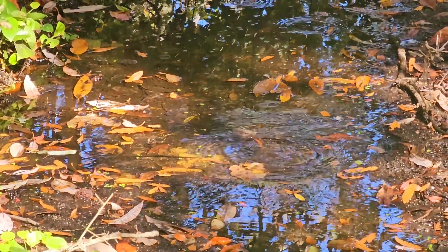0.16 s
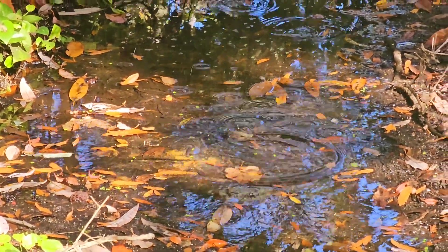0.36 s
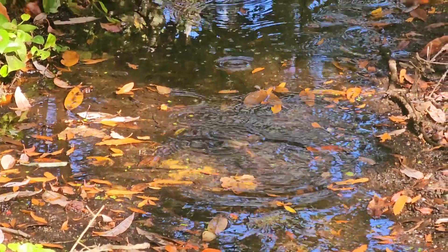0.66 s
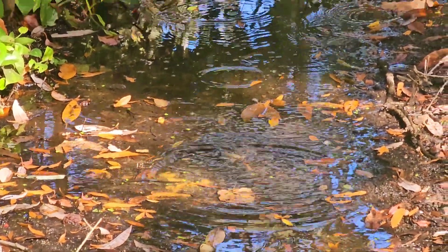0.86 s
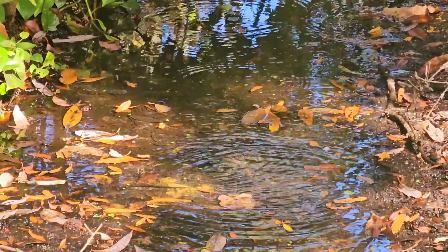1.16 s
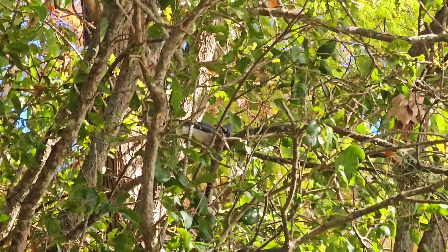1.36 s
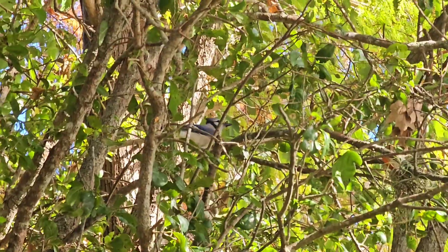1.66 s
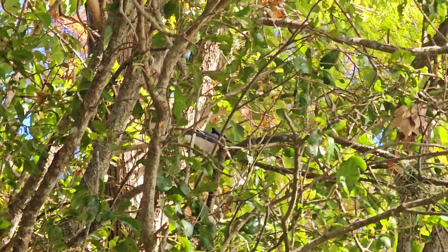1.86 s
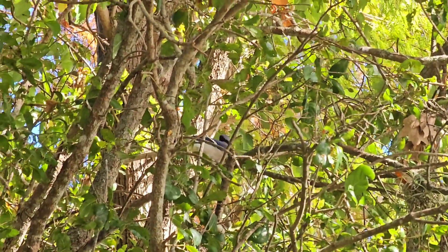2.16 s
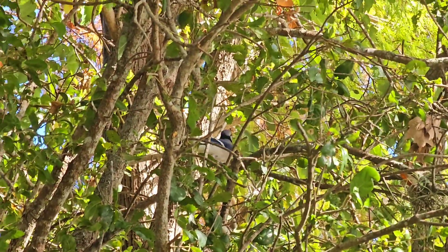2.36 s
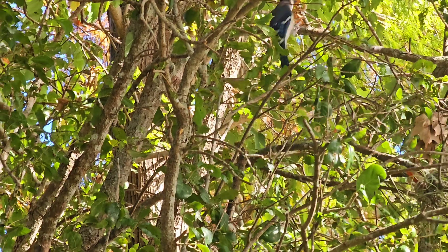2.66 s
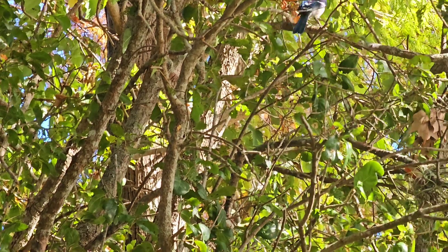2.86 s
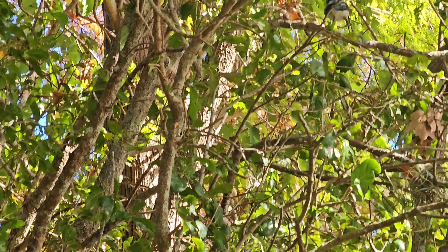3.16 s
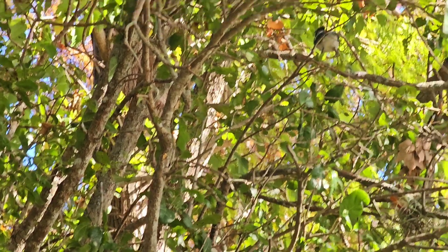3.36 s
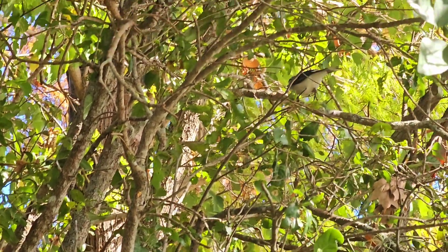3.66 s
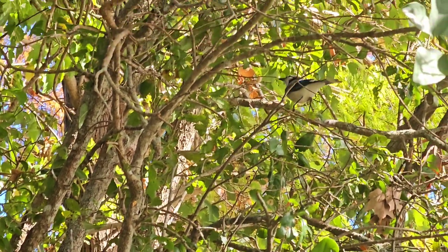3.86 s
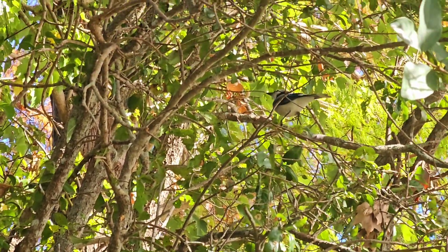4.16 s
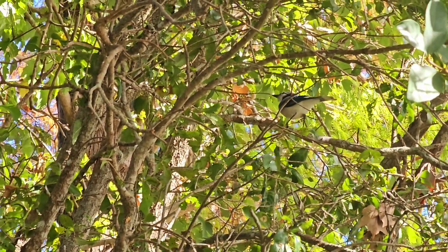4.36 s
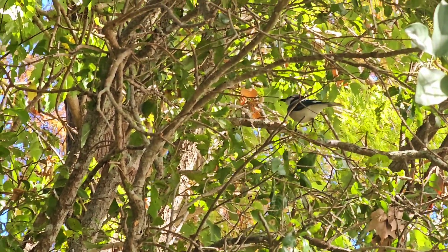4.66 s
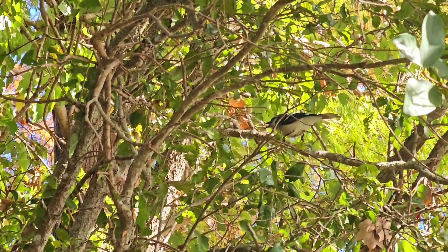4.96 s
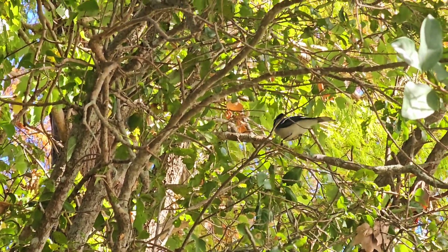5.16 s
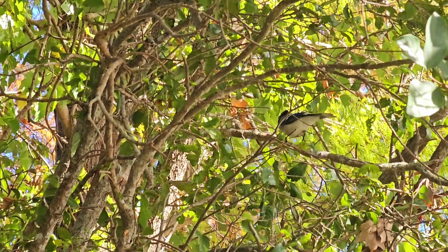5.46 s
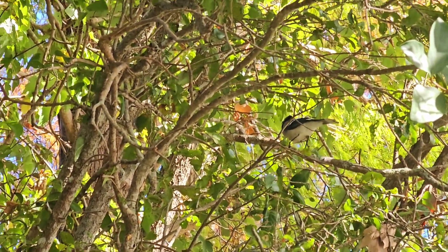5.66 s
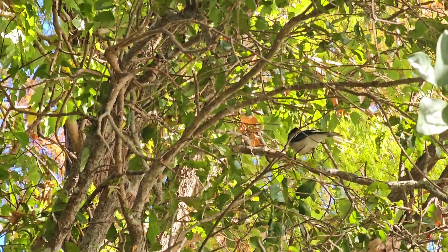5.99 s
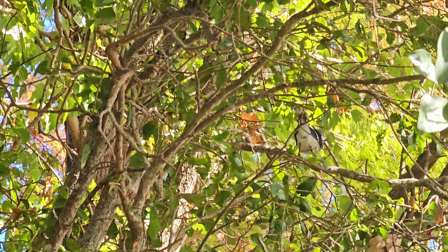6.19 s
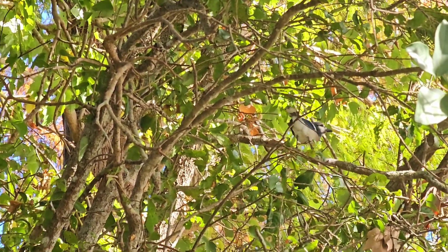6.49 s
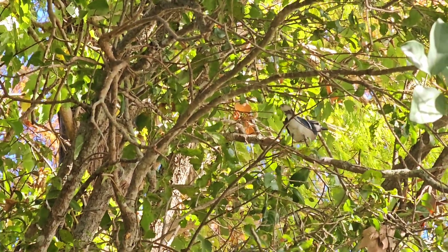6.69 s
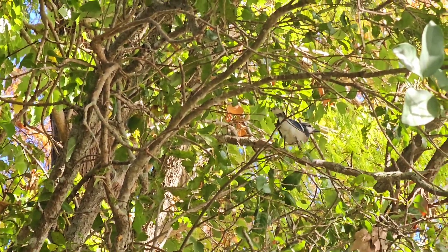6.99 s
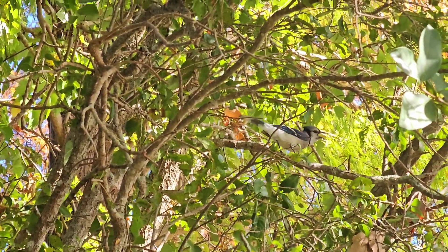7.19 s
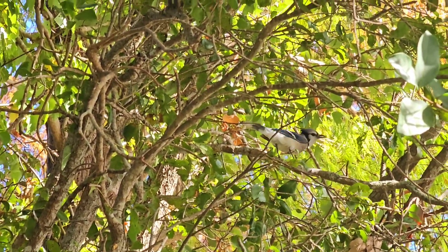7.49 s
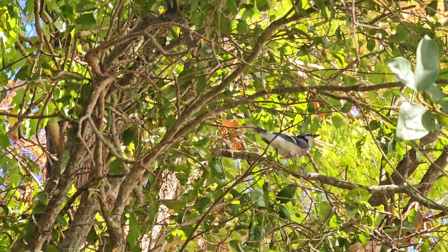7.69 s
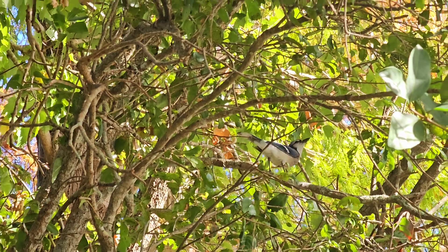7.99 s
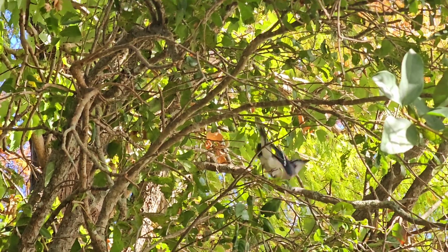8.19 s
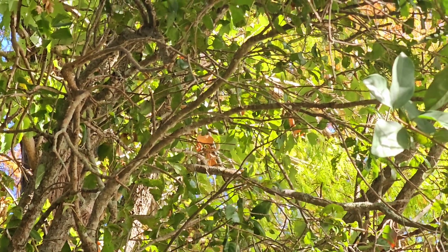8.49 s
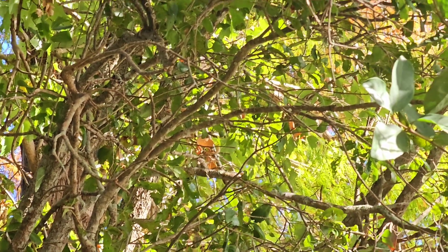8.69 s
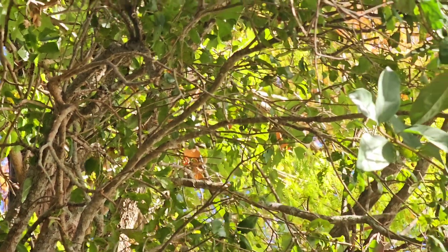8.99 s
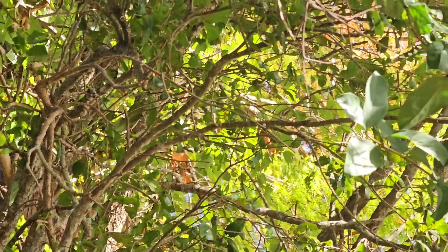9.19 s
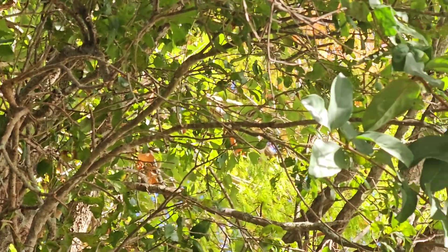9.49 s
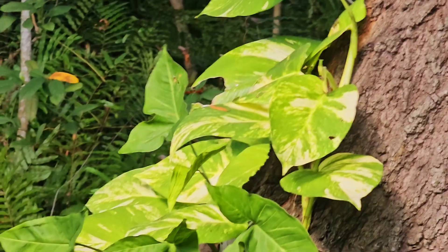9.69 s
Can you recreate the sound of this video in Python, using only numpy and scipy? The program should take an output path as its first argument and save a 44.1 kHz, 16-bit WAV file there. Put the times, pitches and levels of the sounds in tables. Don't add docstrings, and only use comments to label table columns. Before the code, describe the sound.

A quiet outdoor bed runs throughout: low, distant traffic rumble and drone, swelling gently, under a thin hiss that moves with the breeze. From 0 to 0.5 seconds small dry ticks of leaves or drips patter, with a few more scattered later. Near 1.3 seconds the ambience switches with a soft low thump. A jay then calls at about 1.8, 3.4, 4.7, 6.1, 7.1 and 9.3 seconds. Each cry lasts around a third of a second, starting as a bright nasal tone, sliding down and breaking into a rasp, with echoes among the trees. A faint, fuzzy jay answers from afar near 4.0, and a tiny bird chips at 4.4. At 9.65 the scene cuts, stopping the final echo; a brief low rumble with duller hiss and one very faint chip remain until about 9.8. Stereo phone microphones hear the airy hiss wide and the bass centred.

```python
import sys
import numpy as np
from scipy import signal
from scipy.fft import rfft, irfft
from scipy.io import wavfile
from scipy.ndimage import uniform_filter1d, minimum_filter1d

SR = 44100
rng = np.random.default_rng(int(sys.argv[2]) if len(sys.argv) > 2 else 0)


def file_out(sig):
    cols = np.atleast_2d(sig).T
    lim = np.clip(cols, -1, 1)
    pcm = np.round(lim * 32767).astype(np.int16)
    wavfile.write(sys.argv[1], SR, pcm)


def rack_gain(trim_db):
    fader = np.asarray(trim_db, float)
    return 10 ** (fader / 20)


N = 433944
FIRST_CHANGE_S, LAST_CHANGE_S = 1.2665, 9.648
TOP_HZ = 15850

# frequency in Hz, level in dB per Hz.
RUMBLE = [(12, -46), (20, -10), (37, -2), (54, 3.5), (76, -6), (107, -2), (140, -10.5), (184, -3.5),
          (264, -5.5), (323, -15), (353, -16.5), (400, -21), (520, -42), (880, -120)]
# frequency in Hz, level in dB per Hz.
HISS = [(240, -35), (400, -9.5), (467, 0.5), (512, -2.5), (812, -2.5), (890, -3.5), (1210, -8.5),
        (1410, -8), (2010, -14.5), (2650, -21), (5470, -25), (7790, -38), (10400, -42), (11800, -34),
        (15800, -41.5)]
# frequency in Hz, left-right likeness from 0 to 1.
AIR_LIKENESS = [(60, 0.95), (200, 0.97), (380, 0.91), (700, 0.35), (1500, 0.083), (4000, 0.15),
                (12000, .15)]
# frequency in Hz, left over right in dB.
AIR_PAN = [(60, 0), (130, 1.0), (290, 0.5), (640, 1), (1410, 2), (3100, -3), (6820, -2), (15000, 8)]
# frequency in Hz, lead of the left in radians.
AIR_LEAD = [(40, .02), (250, 0.11), (1000, 0.72), (3000, 0.72), (8000, 4.8)]
# start in seconds, traffic, drone, hiss and top hiss in dB.
STRETCHES = [
    (0, -2.5, 3.5, 2, 3.5),
    (1.2665, 1.23, 0.3, 2, 0.3),
    (9.648, 4.5, -7.5, 0.1, -11),
]
# time in seconds, level in dB.
TRAFFIC_EBB = [(0, 2.6), (1.3, 0.5), (4.3, -0.5), (5.2, -1.5), (7, -1.1), (8.7, -1), (9.84, -.5)]
# closest in seconds, lasts in seconds, rumble in dB, drone in dB.
PASSES = [(0.704, 0.87, 5.5, 1), (1.483, 0.32, -3, 8), (2.058, 0.3, -3, 7), (4.92, 0.32, 3.5, 3.5),
          (5.746, 0.39, 3.5, 7), (6.895, 0.59, 5.5, -1), (7.606, 0.86, 0, 2), (8.347, 0.073, 3, -1)]
# time in seconds, hiss level in dB.
BREEZE = [(0, 7), (.8, -0.5), (1.25, -1.5), (2.7, 1.5), (5.7, -3), (8, -3), (9.2, -2.5), (9.84, 3)]
# start in seconds, peak in dB, left over right in dB.
TICKS = [(0.096, -42, -4), (0.1494, -41, -2.5), (0.271, -41, -2), (0.379, -40, -0.5), (0.445, -43, -3),
         (0.509, -42, -2), (0.9194, -54, 3), (1.1994, -53, 15.5), (1.625, -47, 5), (3.3154, -47, 3),
         (4.2974, -58, -6), (4.373, -50, -2.5), (5.234, -44, 0), (8.244, -49, -8), (8.5494, -57, 3),
         (8.7694, -58, -2.5)]
# start in seconds, peak in dB, pitch in Hz, width as a share of the pitch.
CHIPS = [
    (4.362, -46, 5300, .12),
    (9.685, -59, 6000, .05),
]
# start in seconds, length in seconds, level in dB, fade in dB per second,
# first pitch in Hz, last pitch in Hz.
FAR_JAY = (3.97, .23, -44, -120, 1025, 870)
# frequency in Hz, 60 dB decay in seconds.
WOOD_TAIL = [(1500, 0.56), (3000, 0.56), (4000, 0.58), (6000, 0.45), (9000, 0.47), (14000, 0.1)]
# start in seconds, length in seconds, effort in dB, top pitch in Hz,
# pitch before the last drop in Hz.
CALLS = [(1.754, 0.31, -23, 999, 879.5), (3.427, 0.3, -26, 1002, 873.5), (4.718, 0.31, -23.5, 991.5, 874),
         (6.117, 0.32, -23, 985, 890), (7.102, .285, -22, 1008, 870), (9.322, 0.28, -22.5, 1002, 859)]
# rasp starts after seconds, swells for seconds, rasp over the effort in dB,
# brightness in dB.
VOICES = [(0.19, 0.1, -4.5, -14.5), (0.16, 0.066, -5, -12), (0.17, 0.074, -8, -14),
          (0.21, 0.045, -7.5, -14.5), (0.173, 0.034, -9, -12.5), (0.13, 0.086, -10.5, -17.5)]
# frequency in Hz, level in dB.
BEAK = [(1100, -38.5), (1550, -22.5), (1900, -21), (2900, -12.5), (3700, -0.5), (4100, -3), (4800, -12.5),
        (5600, -20), (6100, -20.5), (7000, -24.5), (9400, -27), (10400, -35.5), (11100, -40), (11900, -29),
        (13000, -30), (15500, -40)]
# frequency in Hz, width in Hz, level in dB.
THROAT = [(2880, 2340, 1.5), (3530, 990, 6.5), (4340, 1000, 10), (5440, 760, 2.5), (6800, 1800, -6),
          (12000, 980, -15.5)]
# overtone number, level in dB.
HELD_OVERTONES = [(3, -33), (4, -2.5), (5, 2.5), (6, -13)]
# frequency in Hz, left over right in dB.
BIRD_PAN = [(1800, 4.5), (2900, -2.5), (3900, -0.5), (5500, -9), (7000, 7), (9500, 7.5), (12000, 1),
            (15000, 8)]
# frequency in Hz, lead of the left in radians.
BIRD_LEAD = [(1800, 0.25), (2900, 0.7), (3900, 2.2), (5500, 4.04), (9000, 4)]


def evened(x):
    return x / np.sqrt(np.mean(x ** 2) + 1e-20)


def read(points, hz):
    f, value = np.transpose(points)
    return np.interp(np.log(hz + 1), np.log(f + 1), value)


def add(mix, s, sound):
    part = mix[:, round(s * SR):][:, :sound.shape[1]]
    part += sound[:, :part.shape[1]]


def resonate(x, hz, width):
    b, a = signal.iirpeak(hz, hz / width, SR)
    return signal.lfilter(b, a, signal.lfilter(b, a, x))


def wander(n, hz):
    return evened(signal.lfilter(*signal.butter(2, hz, fs=SR), rng.standard_normal(n)))


def ports(x, pan, lead):
    hz = np.fft.rfftfreq(x.shape[1], 1 / SR)
    half = rack_gain(read(pan, hz) / 2) * np.exp(.5j * read(lead, hz))
    return irfft(rfft(x) * np.array([half, 1 / half]), x.shape[1])


def air_levels(t, hz):
    starts, *levels = np.transpose(STRETCHES)
    stretch = np.searchsorted(starts[1:], t)
    traffic_db, drone_db, hiss_db, top_db = (v[stretch] for v in levels)
    traffic_db = traffic_db + np.interp(t, *np.transpose(TRAFFIC_EBB))
    breeze_db = np.interp(t, *np.transpose(BREEZE))
    closest, lasts, *swells = np.transpose(PASSES)
    rumble_db, passing_db = swells @ np.exp(-((t - closest[:, None]) / lasts[:, None]) ** 2)
    under = [1 / (1 + (hz / edge_hz) ** 6) for edge_hz in (125, 320, 1800, 6500)]
    field_db = np.outer(under[2], traffic_db)
    field_db += np.outer(under[0], rumble_db)
    field_db += np.outer(under[1] - under[0], drone_db + passing_db)
    field_db += np.outer(under[3] - under[2], hiss_db + 0.41 * breeze_db)
    return field_db + np.outer(1 - under[3], top_db + breeze_db)


def outdoors():
    size, hop = 4096, 1024
    frames, hz = N // hop + 5, np.fft.rfftfreq(size, 1 / SR)
    t = np.arange(-1, frames - 1) * hop / SR
    a, b, c, d, patches = rng.standard_normal((5, len(hz), frames))
    patches = evened(uniform_filter1d(uniform_filter1d(patches, 6, 0), 5, 1))
    left, other = a + 1j * b, c + 1j * d
    same = np.clip(read(AIR_LIKENESS, hz), -1, 1)[:, None]
    z = np.array([left, same * left + np.sqrt(1 - same ** 2) * other])
    colour = rack_gain(read(RUMBLE, hz)) + rack_gain(read(HISS, hz) - 15)
    z *= colour[:, None] * rack_gain(air_levels(t, hz) + 2.69 * patches)
    air = signal.istft(z, nperseg=size, noverlap=size - hop)[1]
    return rack_gain(-35) * evened(ports(air, AIR_PAN, AIR_LEAD)[:, hop:hop + N])


def scene_change():
    t = np.arange(900) / SR
    jump = -np.exp(-t / 0.01) * np.cos(2 * np.pi * 190 * t - .6)
    return rack_gain(-22.5) * np.array([jump, jump])


def tick(peak_db, hz, pan_db, share, length):
    t, noise = np.arange(2500) / SR, rng.standard_normal((2, 2500))
    body = evened(resonate(noise, hz, np.clip(share, .04, 1.5) * hz))
    fizz = 0.46 * share ** 2 * evened(resonate(noise, 14500, 5000))
    swell = t / length * np.exp(1 - 2 * t / length)
    lean = rack_gain(np.array([[.5], [-.5]]) * pan_db)
    return rack_gain(peak_db - 5) * (body + fizz) * swell * lean


def trees(x, direct_db):
    near_db, near_t60_s, far_db = 0.5, 0.23, -13.5
    size = round(.75 * SR)
    t = np.arange(size) / SR
    sparse = rng.standard_normal((3, size)) * (rng.random((3, size)) < 1500 / SR)
    near = (sparse[:2] + 0.13 * sparse[2]) * rack_gain(-60 * t / near_t60_s) * (t > .004)
    hz, s, z = signal.stft(rng.standard_normal((2, size)), SR, nperseg=256)
    z = z * rack_gain(-60 * s / read(WOOD_TAIL, hz)[:, None])
    far = signal.istft(z, SR, nperseg=256)[1][:, :size] * np.minimum(t / 0.075, 1)
    echo = rack_gain(near_db) * near / np.linalg.norm(near[0]) + rack_gain(far_db) * far / np.linalg.norm(far[0])
    echo[:, 0] += rack_gain(direct_db)
    return signal.fftconvolve(x[None], echo, axes=1)


def far_jay(length, level_db, fade_db, top_hz, end_hz):
    t = np.arange(0, length, 1 / SR)
    turns = np.cumsum(end_hz + (top_hz - end_hz) * (1 - t / length) ** 1.7) / SR
    tone = 0
    for k, db in [(3, -1), (4, -3), (5, -14)]:
        tone = tone + rack_gain(db) * wander(len(t), 220) * np.cos(2 * np.pi * k * turns)
    return rack_gain(level_db + fade_db * t) * tone * signal.windows.tukey(len(t), .15)


def jay_pitch(t, length, top_hz, late_hz):
    hold_s, knee_s, drop_s = .035, .15, .07
    times = [0, hold_s, knee_s, length - drop_s, length]
    hz = np.interp(t, times, [top_hz, top_hz, 916.3, late_hz, 800])
    return uniform_filter1d(hz, size=900, mode="nearest")


def clear_tone(t, hz, turns, rough, bright_db):
    k = np.arange(1, 18)[:, None]
    upper_db = np.clip((k * hz - 4300) / 600, 0, 1) * (bright_db + 13.5)
    gains = rack_gain(read(BEAK, k * hz) + upper_db) * (k * hz < TOP_HZ)
    flutter = rng.standard_normal(gains.shape)
    flutter = evened(uniform_filter1d(uniform_filter1d(flutter, 150), 150))
    gains *= 1 + np.clip((k - 3.5) * .3, .12, .7) * flutter
    gains[4] *= rack_gain(-12.5)
    gains[:3] *= (1 - np.exp(-(t / .009) ** 2)) * (1 - .15 * rough)
    return (gains * np.cos(2 * np.pi * k * turns + 0.373 * k ** 2)).sum(0) / 0.71


def second_membrane(t):
    turns = np.cumsum(879 * (1 + .008 * wander(len(t), 300))) / SR
    return sum(rack_gain(db) * np.cos(2 * np.pi * n * turns) for n, db in HELD_OVERTONES)


def jay(length, effort_db, top_hz, late_hz, rasp_s, swell_s, rasp_db, bright_db):
    t = np.arange(0, length, 1 / SR)
    attack_s, attack_db, release_s, release_db = 0.026, -21, 0.051, -11
    shape_db = np.interp(t, [0, attack_s, length - release_s, length], [attack_db, 0, 0, release_db])
    effort_db = effort_db + shape_db + 1.5 * wander(len(t), 21)
    bright_db = bright_db + 9 * shape_db / attack_db
    hz = jay_pitch(t, length, top_hz, late_hz)
    rough = np.clip((t - rasp_s) / swell_s / 1.22 + 0.23, 0, 1) ** 2
    scoop = 1 - .27 * np.exp(-(t / .007) ** 2.6)
    shake = (.004 + .013 * rough) * wander(len(t), 400)
    turns = np.cumsum(hz * scoop * (1 + shake)) / SR
    tone = clear_tone(t, hz, turns, rough, bright_db)

    puffs = rng.standard_normal(len(t)) * (.3 + np.exp(-(turns % 1) / .35)) * rack_gain(1.5 * wander(len(t), 200))
    modes = [(-1) ** i * rack_gain(db) * evened(resonate(puffs, f, w)) for i, (f, w, db) in enumerate(THROAT)]
    onset = np.exp(-t / 0.023)
    breath = rack_gain(bright_db - 8.5) * sum(modes[4:])
    hoarse = (.33 * rough * rack_gain(rasp_db) + .15 * onset) * sum(modes)
    cough = rack_gain(8) * np.exp(-t / 0.0059) * evened(resonate(puffs, 2984, 390))

    voice = (1 - 0.41 * rough + 1.18 * onset) * tone
    voice += rough * rack_gain(rasp_db) * second_membrane(t)
    voice += hoarse + breath + cough
    edges = np.minimum(np.minimum(t / .004, (length - t) / .02), 1)
    return rack_gain(effort_db) * voice * edges


def scene():
    mix = outdoors()
    add(mix, FIRST_CHANGE_S, scene_change())
    for s, peak_db, pan_db in TICKS:
        add(mix, s, tick(peak_db, 3480, pan_db, share=0.89, length=0.0083))
    for s, peak_db, hz, share in CHIPS:
        add(mix, s, tick(peak_db, hz, -6, share, length=.016))
    birds = np.zeros((2, N))
    add(birds, FAR_JAY[0], trees(far_jay(*FAR_JAY[1:]), direct_db=-15))
    for (s, *call), voice in zip(CALLS, VOICES):
        add(birds, s, trees(jay(*call, *voice), direct_db=0.0))
    birds = ports(birds, BIRD_PAN, BIRD_LEAD)
    return mix + birds * np.clip((LAST_CHANGE_S - np.arange(N) / SR) / .003, 0, 1)


def roll_off(x):
    return signal.sosfilt(signal.butter(12, 16490, fs=SR, output="sos"), x)


def record(dry):
    hz, t, z = signal.stft(dry, SR, nperseg=2048, noverlap=1024, boundary="even")
    bands = z[:, :1020].reshape(2, 102, 10, -1)
    band_db = 10 * np.log10((abs(bands) ** 2).mean(2) + 1e-20)
    masker_db = -minimum_filter1d(-band_db, size=11, axis=1)
    reach_db = np.interp(np.arange(102), [24, 30], [24, 17])[:, None]
    keep = np.clip((band_db - masker_db + reach_db) / 2.5, .015, 1)
    keep = np.pad(np.repeat(keep, 10, 1), ((0, 0), (0, 5), (0, 0)))
    keep[:, hz < 1500] = 1
    z = z * keep * (hz < TOP_HZ)[:, None]
    heard = signal.istft(z, SR, nperseg=2048, noverlap=1024)[1][:, :N]
    heard = signal.lfilter(*signal.butter(2, 33, "high", fs=SR), heard)
    heard *= np.minimum(np.arange(N)[::-1] / 60, 1)
    return roll_off(heard)


dry = scene()
out = record(dry)
file_out(out)
```